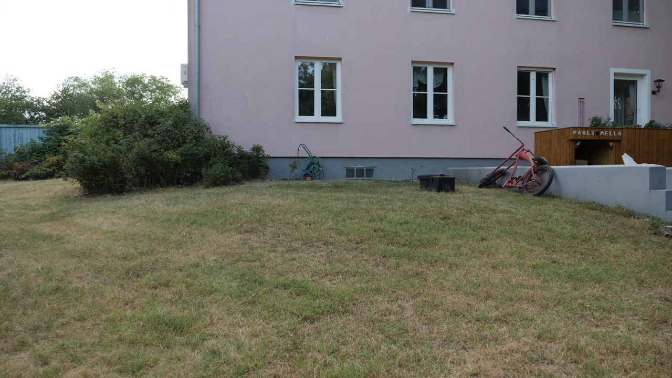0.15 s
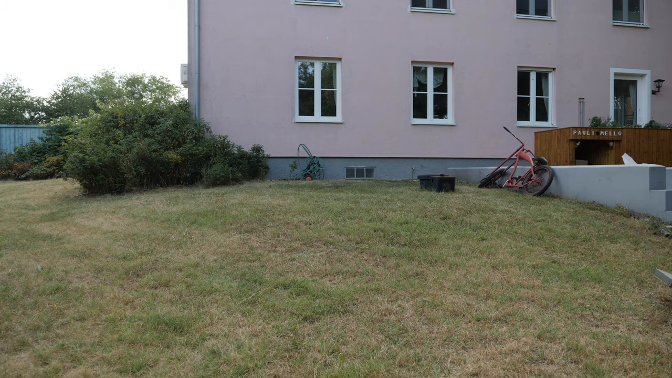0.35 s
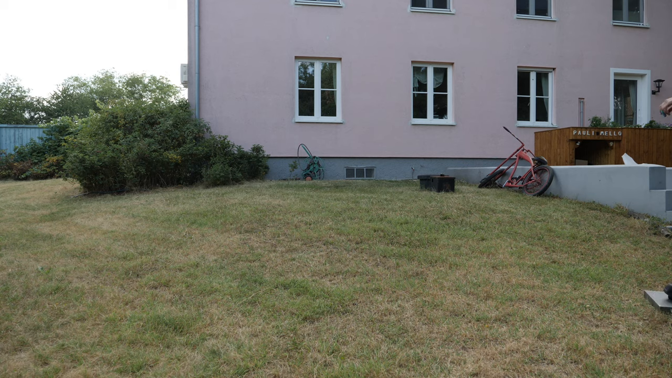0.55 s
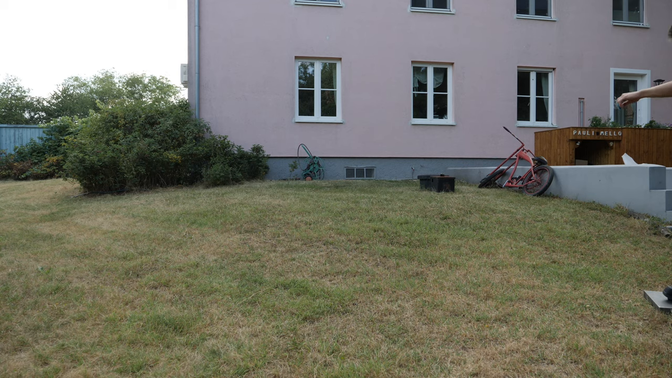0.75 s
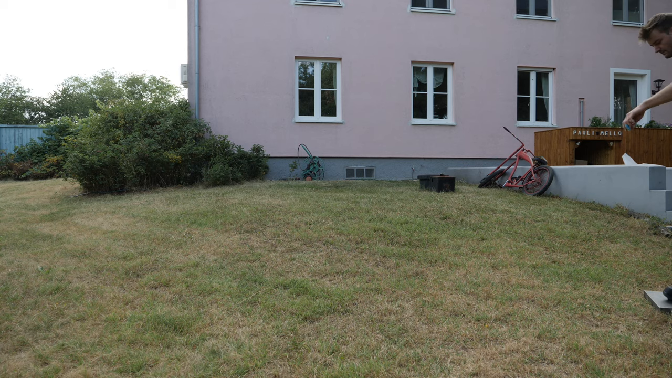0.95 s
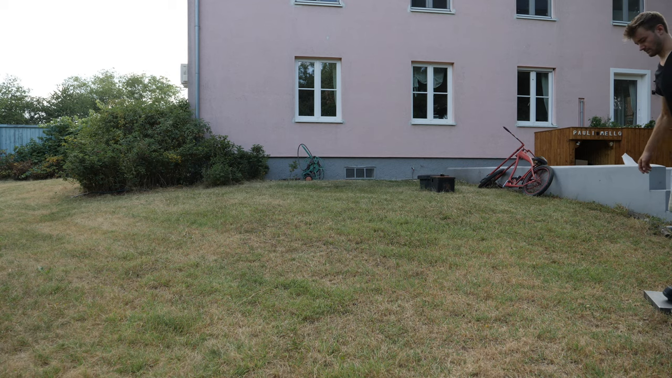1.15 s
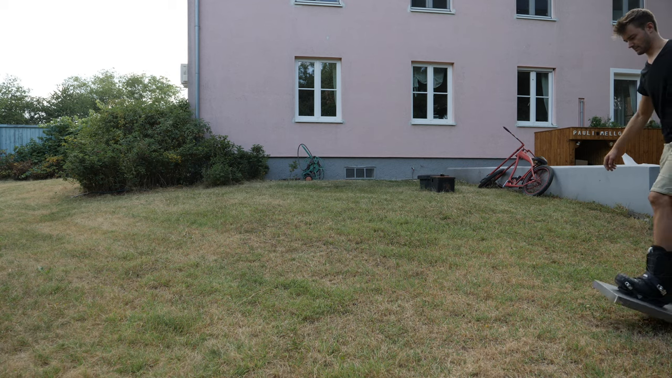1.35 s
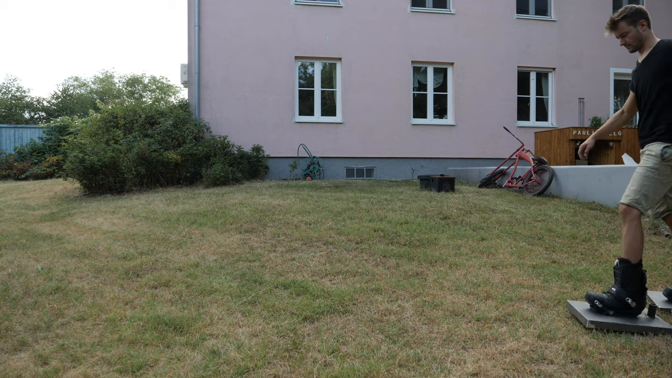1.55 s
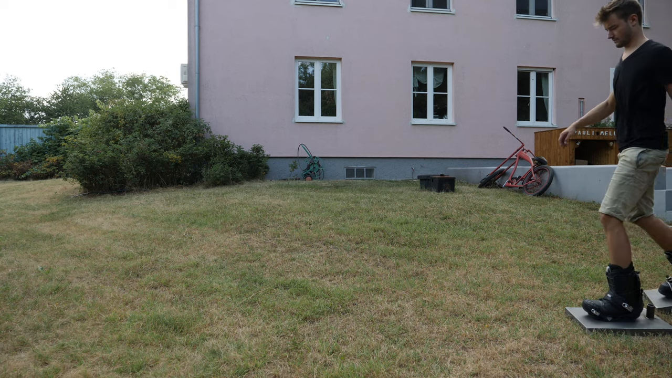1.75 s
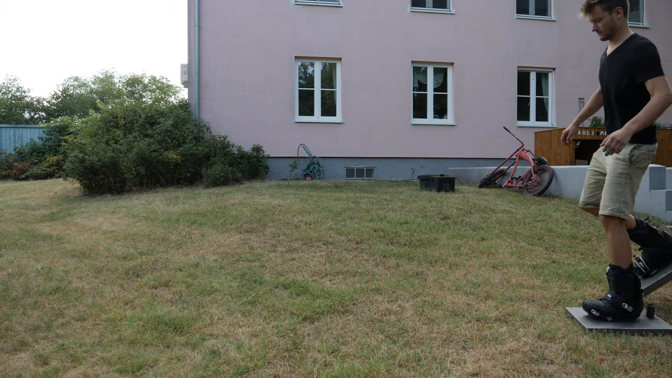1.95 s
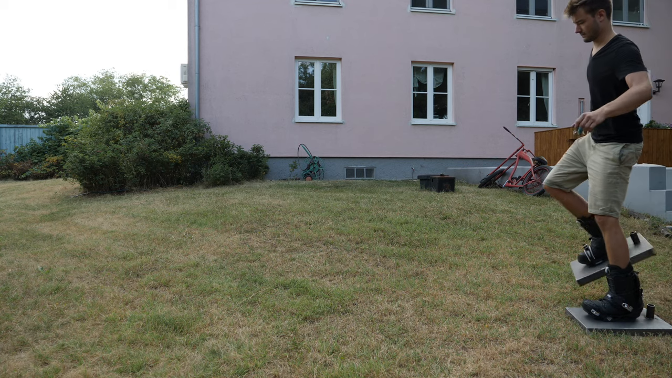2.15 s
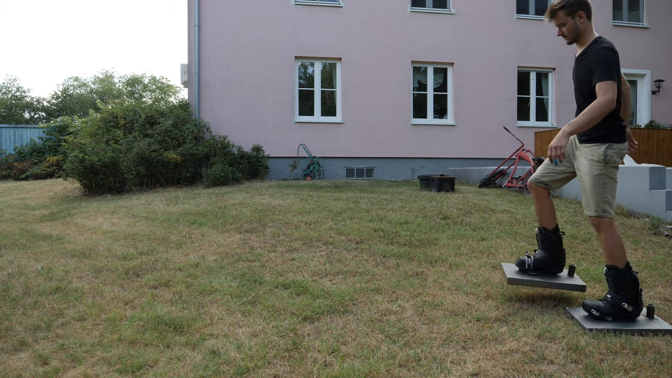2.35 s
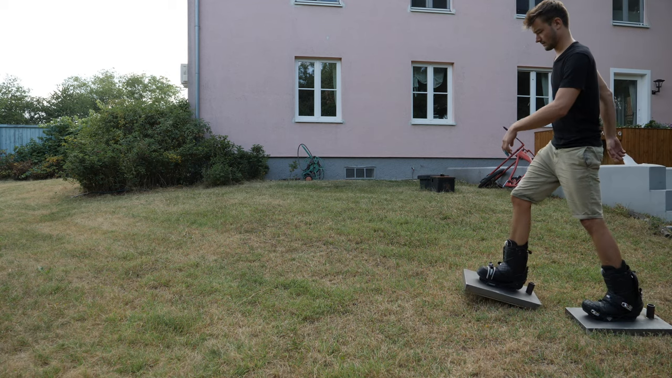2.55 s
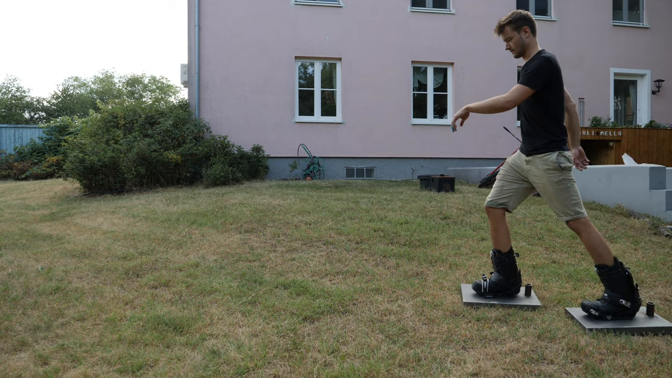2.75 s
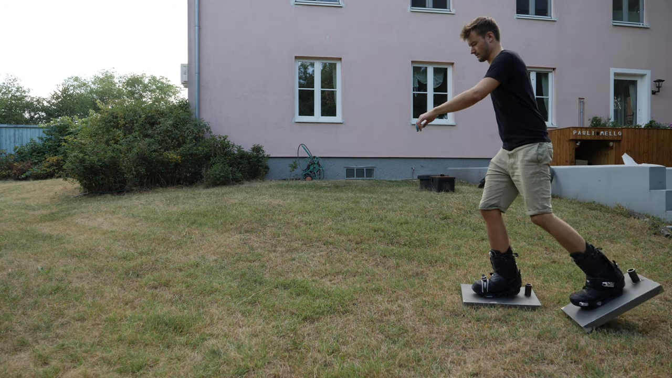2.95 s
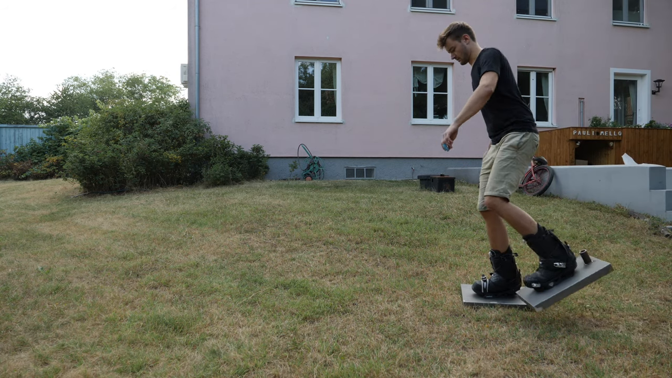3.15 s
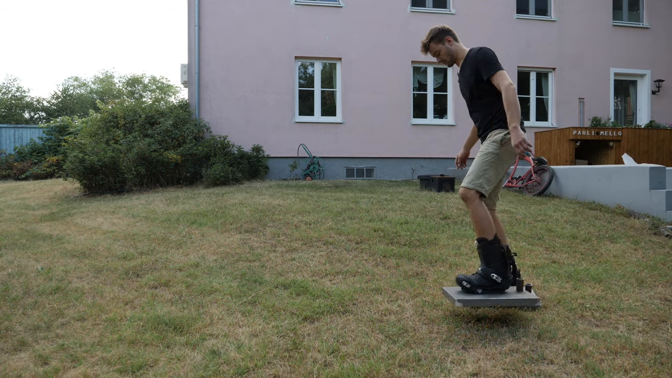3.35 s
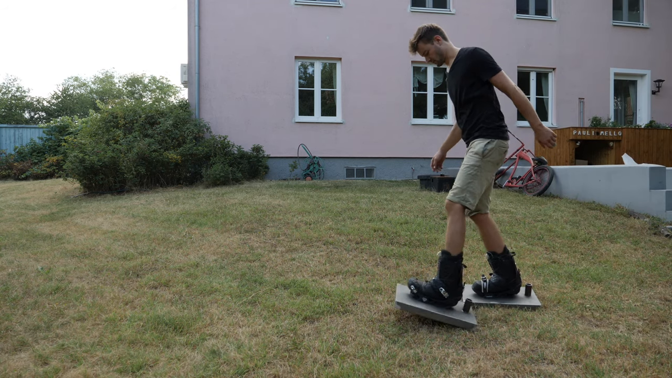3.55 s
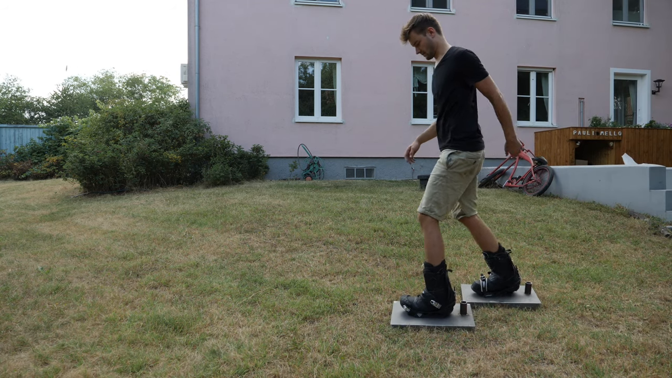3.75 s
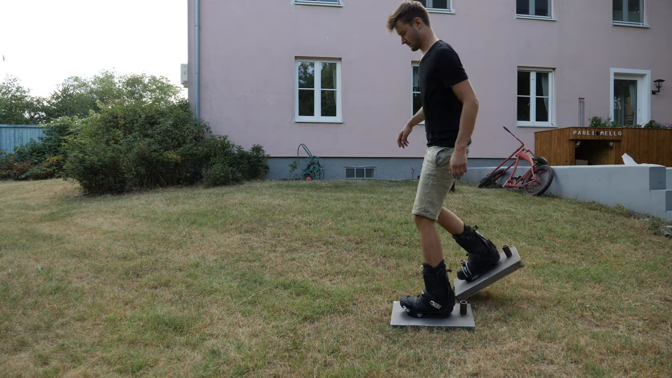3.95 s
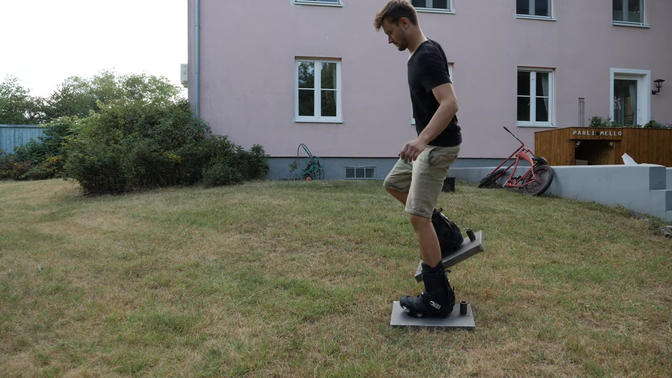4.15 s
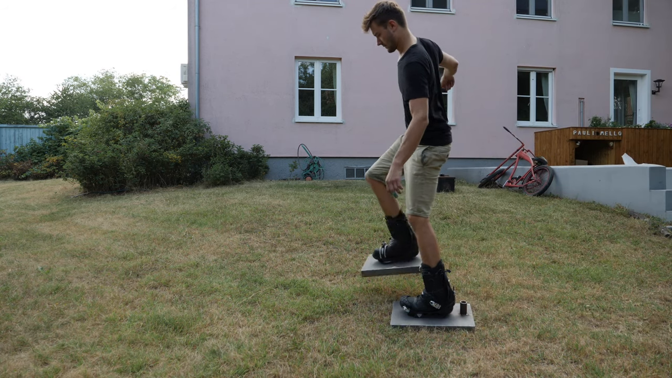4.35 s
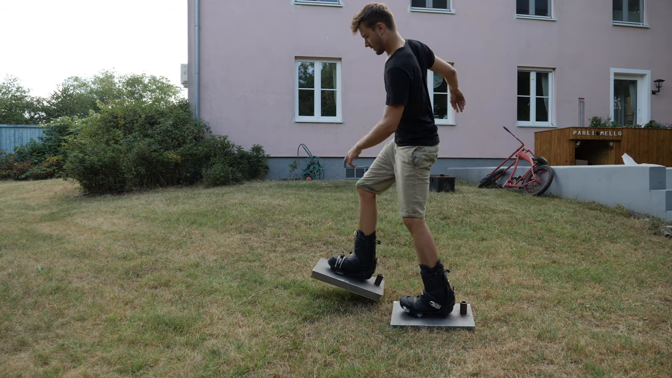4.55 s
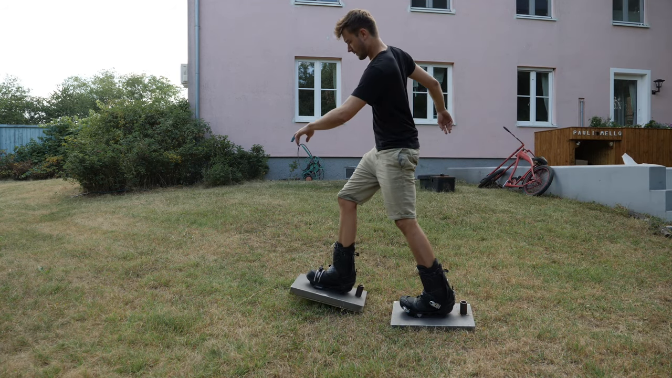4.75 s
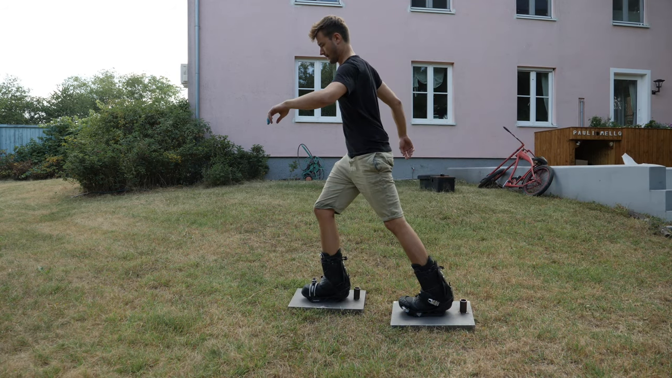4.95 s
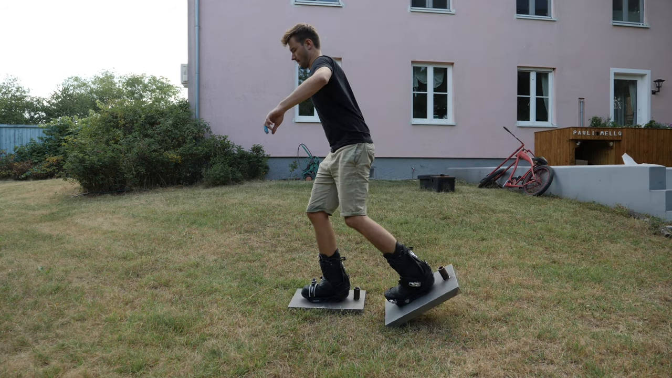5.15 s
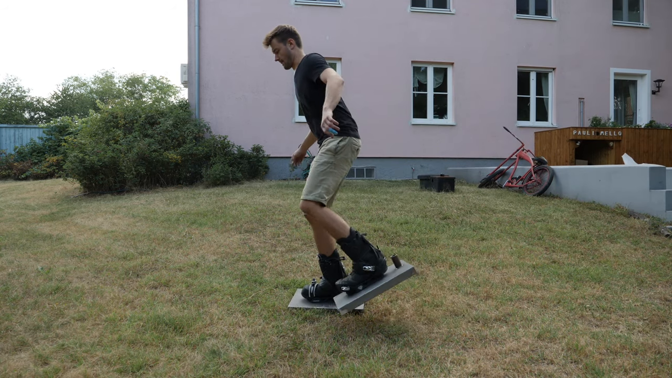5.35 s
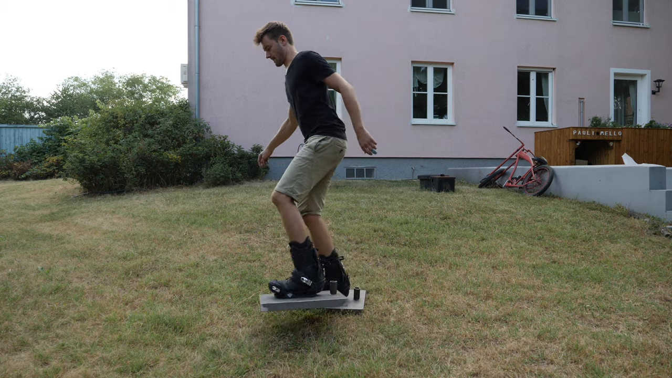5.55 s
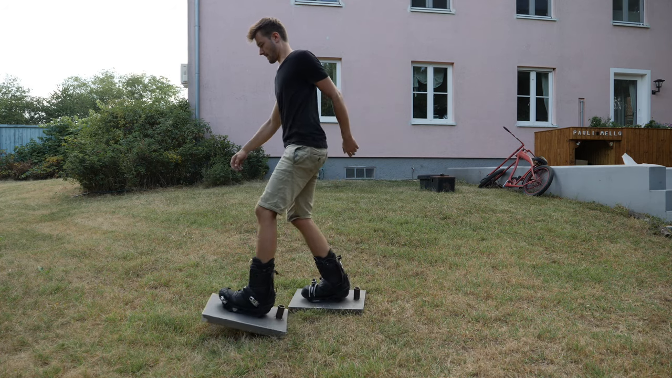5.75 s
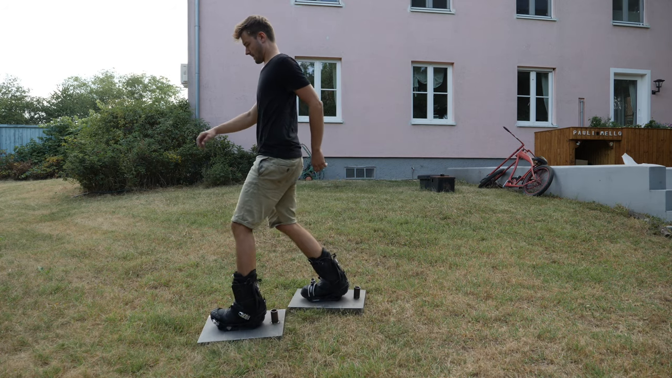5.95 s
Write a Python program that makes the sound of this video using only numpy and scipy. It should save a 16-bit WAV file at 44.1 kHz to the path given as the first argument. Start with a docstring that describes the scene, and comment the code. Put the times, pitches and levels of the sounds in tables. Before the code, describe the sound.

Slow heavy steps on dry lawn: metal plates clack and slap down, grass crunches, plastic boots creak, buckles snap, low wind buffets.

```python
"""Metal plates bolted under stiff plastic boots knock and thud flat as a walker crosses a dry lawn.
Knocks are chattering contacts that ring plate modes, with noise for grit; thuds are low damped rings.
Grass swishes and crushes as shaped grain noise; boot shells creak in stick-slip trains and lone ticks.
Buckles snap as short band-limited noise bursts. Behind them lie distant air and gusts on the microphone.
One microphone channel in the open: no room echo is added, and distance is carried by the levels alone."""
import sys
import numpy as np
from scipy import signal
from scipy.fft import rfft, irfft
from scipy.io import wavfile
from scipy.ndimage import uniform_filter1d

SR = 44100
rng = np.random.default_rng(int(sys.argv[2]) if len(sys.argv) > 2 else 0)


def transcribe(signal):
    """Save signal, clipped to [-1, 1], as a 16-bit WAV file at the path in sys.argv[1]."""
    frames = np.atleast_2d(signal).T
    limited = np.clip(frames, -1, 1)
    pcm = np.round(limited * 32767).astype(np.int16)
    wavfile.write(sys.argv[1], SR, pcm)


N = 265041   # samples, about 6 s

# Plate edge meets the ground: (time [s], relative level [dB], bright grit against the knock [dB])
KNOCKS = [(0.468, -27, -28), (1.515, -33.5, -19.5), (1.524, -14.5, -7), (2.598, -24, -24),
          (3.604, -18, -12), (3.611, -16, -16), (4.971, -44, -1.5), (5.828, -30, -12), (5.842, -31, -23.5)]
# Ringing modes of the metal plate: (frequency [Hz], relative level [dB], t60 [s])
PLATE_MODES = [(446.2, -16.5, 0.467), (578.4, -17, 0.44), (701, -21.5, 0.16), (832.2, -3.5, 0.165),
               (1151.3, 5.5, 0.064), (1273.5, 5.5, 0.0294), (1541, -1.5, 0.12), (1756, -6.5, 0.115),
               (2035, -8, 0.157), (2660, -17.5, 0.3), (4350, -11, 0.082)]
# Spectrum of dry blades, also lent to bright grit and boot cracks: (frequency [Hz], relative level [dB])
SWISH_SPECTRUM = [(590, -42), (1000, -23), (1620, -9), (4630, -5.5), (6850, -7), (9240, -2.5),
                  (10700, -16.5), (13200, -10.5), (15700, -15)]
# Spectrum of crushed turf, also lent to the crunch of a knock: (frequency [Hz], relative level [dB])
CRUSH_SPECTRUM = [(71, -40.5), (120, -7.5), (177, 2), (306, -4), (554, 1.5), (871, -4), (1990, -8),
                  (5000, -23.5), (6500, -24), (11000, -120)]


def knocks():
    """Each knock is a dying chatter of contacts that rings the plate, with a crunch of grit."""
    s, level_db, grit_db = np.transpose(KNOCKS)
    bright_db = level_db + grit_db

    # later contacts of the chatter are weaker
    late = np.sort(rng.exponential(1, (len(KNOCKS), 14)), axis=1)
    late -= late[:, :1]
    contact_s = s[:, None] + 0.012 * late
    contact_db = level_db[:, None] - 26.5 - 2.0 * late
    plate = strike(PLATE_MODES, contact_s.ravel(), contact_db.ravel(), scatter_db=5.0)

    crunch = coloured(grains(per_s=3000, spread_db=9.5, smooth=0.61), CRUSH_SPECTRUM)
    crunch *= dying(impulses(s, level_db - 6.0), t60=0.0774)
    crunch = signal.sosfilt(signal.butter(2, 300, "high", fs=SR, output="sos"), crunch)

    hiss = coloured(rng.standard_normal(N), SWISH_SPECTRUM)
    hiss *= dying(impulses(s, bright_db - 16.5), t60=0.0367)

    # small stones crack under the edge
    stones = grains(per_s=2500, spread_db=3.5, smooth=0.295)
    stones *= dying(impulses(s, bright_db + 2.0), t60=0.1104)
    stones = signal.sosfilt(signal.butter(1, [2200, 6000], "band", fs=SR, output="sos"), stones)
    return plate + crunch + hiss + stones


# Plate slaps flat: (time [s], relative level [dB])
THUDS = [(0.671, -21), (1.716, -14.5), (2.792, -26), (3.81, -41.5)]
THUD_HZ, THUD_STAGE_T60_S = 122.7, 0.02257   # two equal stages in a row


def thuds():
    """A push through two low resonances in a row swells and dies without a hard edge."""
    push = impulses(*np.transpose(THUDS)) * from_db(-40)
    first_stage = ring(push, THUD_HZ, THUD_STAGE_T60_S)
    return ring(first_stage, THUD_HZ, THUD_STAGE_T60_S)


# A plate presses on or drags through grass: (time of most turf pressure [s], build-up per SPAN_DB [s],
#     fade per SPAN_DB [s], swishing blades level [dB], crushed turf level [dB])
PRESSES = [(0.174, 0.026, 0.92, -64, -59), (0.478, 0.078, 0.116, -50, -42.5),
           (.665, 0.1273, 0.258, -50.5, -45.5), (.89, 0.09, 0.112, -58, -47.5),
           (1.525, 0.0459, 0.1183, -41.5, -39), (1.71, 0.133, 0.19, -46, -43),
           (2.05, 0.77, 0.18, -61.5, -51.5), (2.28, 0.06, 0.134, -60, -52.5),
           (2.608, 0.1066, 0.176, -48, -43), (2.777, 0.053, 0.206, -45.5, -43.5),
           (3.06, 0.0914, 0.0857, -49.5, -46), (3.616, 0.0472, 0.0827, -37, -38),
           (3.797, 0.146, 0.118, -44, -42.5), (3.865, .08, 0.18, -48.5, -46.5),
           (4.19, 0.9, 0.112, -59, -53.5), (4.771, 0.161, 0.55, -52, -48),
           (4.996, 0.1024, 0.2365, -45.5, -42.5), (5.271, 0.111, 0.144, -53.5, -51.5),
           (5.45, 0.2, 0.9, -84, -59.5), (5.83, 0.0875, 0.132, -41.5, -45), (6.02, 0.21, .1, -48, -43)]
SPAN_DB = 20   # level step that the build-up and fade times cover
BLADES_LEAD_S = 0.00993   # blades bend before the turf gives way
STILL_SWISH_DB, STILL_CRUSH_DB = -77, -70.5   # rustle while no plate presses


def pressure(peak_db, still_db, lead_s):
    """Each press swells and fades at a steady dB rate; the presses add in power."""
    s, rise, fade = np.transpose(PRESSES)[:3, :, None]
    step = 64   # samples between gain points
    late = np.arange(0, N + step, step) / SR + lead_s - s
    level_db = peak_db[:, None] - SPAN_DB * np.maximum(late / fade, -late / rise)
    gain = np.sqrt(np.sum(from_db(level_db) ** 2, axis=0) + from_db(still_db) ** 2)
    return np.interp(np.arange(N) / step, np.arange(len(gain)), gain)


def grass():
    """Blades brush the plate in fine bright grains; turf gives way in coarser dull ones."""
    swish_db, crush_db = np.transpose(PRESSES)[3:]
    fine = patchy(grains(per_s=3100, spread_db=5.5, smooth=0.855), depth_db=6.0, per_s=27)
    coarse = patchy(grains(per_s=800, spread_db=2.5, smooth=1.455), depth_db=5.5, per_s=37)
    swish = pressure(swish_db, STILL_SWISH_DB, BLADES_LEAD_S) * coloured(fine, SWISH_SPECTRUM)
    crush = pressure(crush_db, STILL_CRUSH_DB, 0) * coloured(coarse, CRUSH_SPECTRUM)
    return swish + crush


# Boot shell modes before the pitch factor: (frequency [Hz], relative level [dB], t60 [s])
SHELL_MODES = [(482.5, -11.5, 0.0276), (945.3, -11.5, 0.0337), (1338, -16, 0.0278), (1934.5, -13.5, 0.0206),
               (2386, 6, 0.00182), (4045, -6.5, 0.00486)]
# Creaks: (start [s], length [s], slip rate at start [1/s], at middle [1/s], at end [1/s],
#     relative shell ring level [dB], relative crack level [dB], pitch factor of the flexed shell [ratio],
#     pitch of the rubbing joint [Hz], relative joint ring level [dB])
CREAKS = [(.166, 0.1158, 59.83, 122.8, 68.4, -46, -32.5, 0.506, 1000, -51.5),
          (0.322, 0.12, 118.2, 152.5, 145.2, -65.5, -35, 0.96, 2080, -63),
          (0.861, 0.0527, 252.8, 198.9, 153.5, -45.5, -35, 1.29, 3230, -56.5),
          (1.0756, 0.1155, 37.75, 34.2, 30.7, -55, -41.5, 1.1, 1308, -52.5),
          (1.737, 0.0753, 100.8, 230.3, 129.5, -42.5, -41, 1.103, 3154, -45),
          (1.896, 0.0883, 116.5, 97.7, 85.5, -43.5, -32, 1.067, 1970, -56),
          (1.998, 0.0651, 99, 203.8, 149, -47.5, -31.5, 1.06, 2356, -52),
          (2.076, .076, 80.6, 85.3, 185, -50, -36.5, 0.86, 991, -53.5),
          (2.229, 0.0785, 109.8, 119.7, 107.4, -53, -29.5, 1.04, 2100, -69.5),
          (2.335, 0.1056, 48.55, 31.66, 34.5, -51, -28.5, 1.134, 1990, -57.5),
          (2.446, 0.144, 75.08, 112.5, 120.7, -46.5, -32, 1.072, 2013, -55),
          (2.814, 0.057, 170.1, 74.2, 72.3, -48, -46.5, 1.08, 3260, -52),
          (2.954, .122, 95.34, 106, 246, -48.5, -43.5, 0.957, 1234, -48.5),
          (3.827, 0.1278, 178.6, 69.42, 125.6, -47.5, -48.5, 1.33, 3070, -43.5),
          (4.002, .152, 185, 155, 88, -43, -30, 1.0, 1900, -50),
          (4.153, 0.0524, 106.1, 300.9, 372.6, -49.5, -35.5, 0.876, 1910, -62),
          (4.726, 0.228, 104.5, 107.5, 113.7, -45.5, -54.5, 1.122, 1730, -65),
          (5.3505, .095, 38.87, 88.36, 43.8, -47, -37, 0.952, 1184, -49),
          (5.4682, 0.087, 43.8, 56.98, 70, -47, -36, 0.939, 1194, -51.5)]
JOINT_CYCLES = 30   # the joint falls by 60 dB in this many cycles


def creaks():
    """The shell sticks and lets go once for every slip length travelled; returns rings and cracks."""
    rings, cracks = np.zeros(N), np.zeros(N)
    share, slip = np.linspace(0, 1, 101), np.arange(24)   # share of the creak; slip numbers
    for start, length, first, middle, last, ring_db, crack_db, stretch, joint_hz, joint_db in CREAKS:
        # travel in slip lengths
        rate = np.interp(share, [0, 0.5, 1], [first, middle, last])
        travel = np.cumsum(rate) * length / 100
        travel -= travel[0]
        uneven_slip = np.abs(slip + 0.07 * rng.standard_normal(len(slip)))
        at = start + length * np.interp(uneven_slip, travel, share)
        # slips past the end of the travel are silenced
        level_db = 1.6 * rng.standard_normal(len(slip)) - 200 * (slip > travel[-1])

        rings += strike(SHELL_MODES, at, level_db + ring_db, scatter_db=1.5, stretch=stretch)
        rings += ring(impulses(at, level_db + joint_db), joint_hz, JOINT_CYCLES / joint_hz)
        cracks += crack(impulses(at, level_db + crack_db), t60=0.006)
    return rings, cracks


def crack(clicks, t60):
    """One rubbing spot cracks alike on every slip: a sharp pulse and the same short scatter after it."""
    burst = rng.standard_normal(300) * from_db(-60 * np.arange(300) / (t60 * SR))
    burst[0] = 7
    return signal.oaconvolve(clicks, burst / np.sqrt(np.sum(burst ** 2)))[:N]


# Lone slips of a boot shell: (time [s], relative level [dB])
TICKS = [(0.9986, -49.5), (1.061, -44), (1.114, -45.5), (1.154, -44.5), (1.188, -46), (1.2216, -45.5),
         (1.281, -45), (1.3546, -50), (1.4197, -54.5), (1.8373, -37), (1.8511, -36), (2.328, -40),
         (3.235, -47), (3.3073, -49), (3.3957, -57), (3.4283, -44), (3.4706, -35), (4.246, -45),
         (4.456, -39.5), (4.4748, -39), (4.598, -45), (4.6331, -41.5), (4.6667, -45), (5.5775, -49.5),
         (5.6241, -46.5)]
TICK_CRACK_DB = -12.5   # crack against the tick level


def ticks():
    """A lone slip rings the shell and cracks as a dying noise burst; returns rings and cracks."""
    s, level_db = np.transpose(TICKS)
    rings = strike(SHELL_MODES, s, level_db - 4.5, scatter_db=5.5, stretch=0.885)
    cracks = rng.standard_normal(N) * dying(impulses(s, level_db + TICK_CRACK_DB), t60=0.0137)
    return rings, cracks


def boots():
    """Creaks and ticks together: shell and joint rings under bright plastic cracks."""
    creak_rings, creak_cracks = creaks()
    tick_rings, tick_cracks = ticks()
    # plastic cracks duller than dry blades
    duller = signal.butter(1, 12000, fs=SR, output="sos")
    cracks = signal.sosfilt(duller, creak_cracks + tick_cracks)
    return creak_rings + tick_rings + coloured(cracks, SWISH_SPECTRUM) * np.std(cracks)


# Buckles and bindings snap: (time [s], relative level [dB], nominal pitch [Hz], burst t60 [s])
SNAPS = [(0.844, -25.5, 2030, 0.0082), (1.92, -24.5, 1842, 0.037), (2.84, -32.5, 3280, 0.0226),
         (3.013, -25.5, 2240, 0.0256), (3.973, -30.5, 4210, 0.0135), (3.983, -25.5, 1536, 0.063),
         (5.04, -27.5, 2990, 0.059), (5.041, -37, 8670, 0.057), (5.086, -34, 8600, 0.0356),
         (5.193, -23, 2560, 0.0161), (5.196, -28.5, 1116, 0.0414)]


def buckles():
    """Each snap is a short noise burst sounding through one broad resonance."""
    out = np.zeros(N)
    for s, level_db, hz, t60 in SNAPS:
        at, size = round(s * SR), round(2 * t60 * SR)
        fade_db = level_db - 60 * np.arange(size) / (t60 * SR)
        burst = from_db(fade_db) * rng.standard_normal(size)
        band = signal.butter(1, [hz / 1.42, hz * 1.235], "band", fs=SR, output="sos")
        resonance = signal.sosfilt(band, signal.sosfilt(band, burst))
        out[at:at + size] += 1.78 * resonance + 0.0433 * burst
    return out


# Spectrum of the distant air: (frequency [Hz], relative level [dB])
AIR_SPECTRUM = [(35, -22.5), (60, 26.5), (76, 1.5), (118, 7), (455, -4.5), (631, -19), (1890, -26),
                (3300, -70), (8770, -19), (15700, -21)]
AIR_DB = -68   # rms level


def distant_air():
    """Steady coloured noise lies far behind the walker."""
    return from_db(AIR_DB) * coloured(rng.standard_normal(N), AIR_SPECTRUM)


# Wind pressure on the microphone: (time [s], level [dB])
GUSTS = [(0.0, -34), (0.32, -25.5), (0.58, -24), (0.68, -39), (0.92, -30.5), (1.1, -45), (1.55, -37),
         (1.79, -37), (2.14, -27.5), (2.6, -37.5), (2.92, -17.5), (3.1, -33), (3.44, -20), (3.7, -30.5),
         (4.3, -22.5), (4.48, -43.5), (4.6, -33), (4.84, -38.5), (4.96, -24), (5.32, -53), (5.45, -27),
         (6.01, -30)]
# Spectrum of the wind rumble: (frequency [Hz], relative level [dB])
WIND_SPECTRUM = [(3.5, -44.5), (6, 2.5), (16, 2.5), (27, -6), (42, -16.5), (58, -33.5), (80, -33.5),
                 (120, -64), (200, -88)]


def wind():
    """Lumpy pressure noise on the microphone, evened out so that the gusts set its level."""
    lumps = coloured(rng.standard_normal(N), WIND_SPECTRUM)
    power = uniform_filter1d(uniform_filter1d(lumps ** 2, 5000), 5000)
    s, level_db = np.transpose(GUSTS)
    gust_db = np.interp(np.arange(N) / SR, s, level_db)
    return from_db(gust_db) * lumps / np.sqrt(power + 0.45)


def from_db(db):
    """Decibels to gain."""
    return 10 ** (np.asarray(db) / 20)


def rms_one(x):
    """Scales to rms 1."""
    return x / np.sqrt(np.mean(x ** 2) + 1e-20)


def coloured(x, spectrum):
    """Weights a signal by a (frequency [Hz], level [dB]) table, joined over log frequency; rms 1."""
    hz, level_db = np.transpose(spectrum)
    axis = np.maximum(np.arange(N // 2 + 1) * SR / N, 1)
    gain = from_db(np.interp(np.log(axis), np.log(hz), level_db))
    return rms_one(irfft(rfft(x) * gain, N))


def grains(per_s, spread_db, smooth):
    """Random crackles of very uneven size on a bed of smooth noise."""
    sizes = from_db(spread_db * np.minimum(rng.exponential(1, N), 2)) * rng.standard_normal(N)
    crackles = rms_one(sizes * (rng.random(N) < per_s / SR))
    return crackles + smooth * rng.standard_normal(N)


def patchy(x, depth_db, per_s):
    """Tufts differ: each octave swells and sinks on its own."""
    out, knots = 0, np.arange(0, N + SR, SR / per_s)
    for low_hz in 120 * 2.0 ** np.arange(7):
        slow = np.interp(np.arange(N), knots, rng.standard_normal(len(knots)))
        octave = signal.butter(1, [low_hz, 2 * low_hz], "band", fs=SR, output="sos")
        out = out + from_db(depth_db * slow) * signal.sosfilt(octave, x)
    return out


def impulses(s, peak_db):
    """A click train from times and levels."""
    out = np.zeros(N)
    at = np.minimum((np.asarray(s) * SR).astype(int), N - 1)
    np.add.at(out, at, from_db(peak_db))
    return out


def dying(clicks, t60):
    """Each click starts an exponential fade."""
    return signal.lfilter([1], [1, -from_db(-60 / (t60 * SR))], clicks + 1e-18)


def ring(clicks, hz, t60):
    """A damped resonance: a unit click sets a sine of height 1 ringing."""
    r, w = from_db(-60 / (t60 * SR)), 2 * np.pi * hz / SR
    return signal.lfilter([0, np.sin(w)], [1, -2 * r * np.cos(w), r * r], clicks + 1e-18)


def strike(modes, s, peak_db, scatter_db, stretch=1):
    """Contacts at times s ring every mode, each with a strength of its own."""
    scatter = scatter_db * rng.normal(0, 1, (len(s), len(modes)))
    out = np.zeros(N)
    for k, (hz, level_db, t60) in enumerate(modes):
        out += ring(impulses(s, peak_db + level_db + scatter[:, k]), hz * stretch, t60)
    return out


def scene():
    """The walker, from plates to buckles, before distant air and wind."""
    walker = knocks() + thuds() + grass() + boots() + buckles()
    return (walker + distant_air() + wind())[None]


CUTOFF_HZ = 16000   # from here up the treble is at least 70 dB down


def record(dry):
    """The microphone signal loses its top treble through a steep low-pass."""
    return signal.sosfilt(signal.cheby2(24, 70, CUTOFF_HZ, fs=SR, output="sos"), dry)


dry = scene()
out = record(dry)
transcribe(out)
```